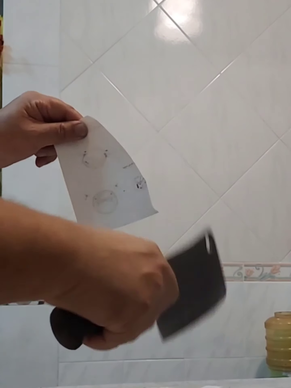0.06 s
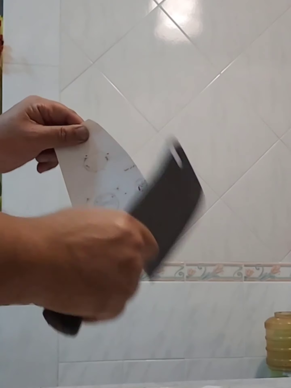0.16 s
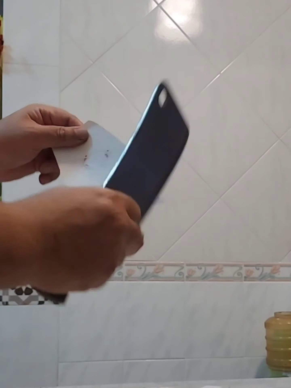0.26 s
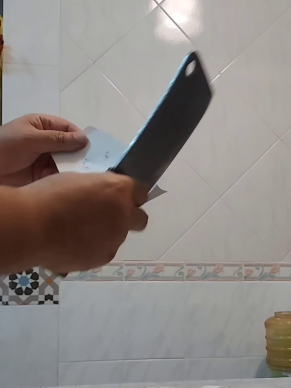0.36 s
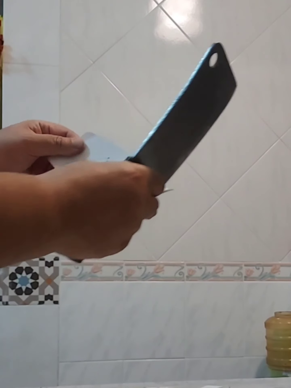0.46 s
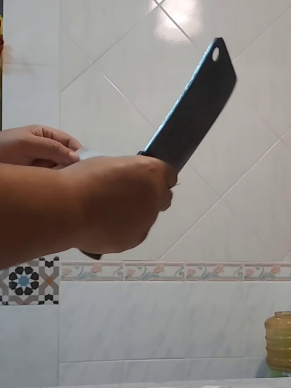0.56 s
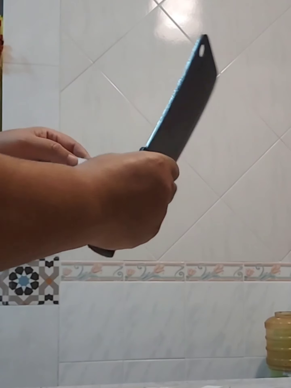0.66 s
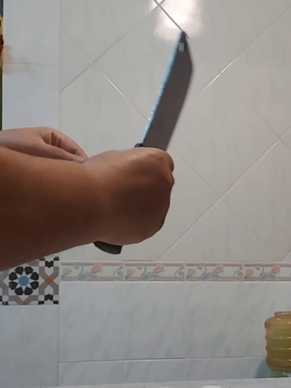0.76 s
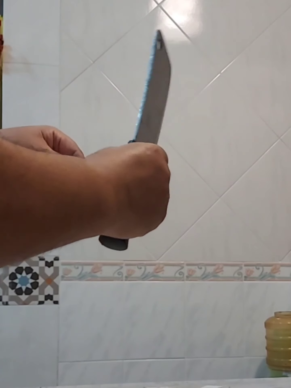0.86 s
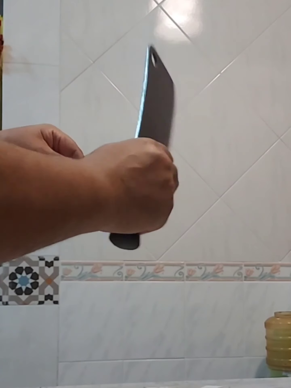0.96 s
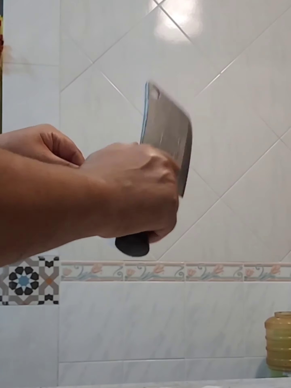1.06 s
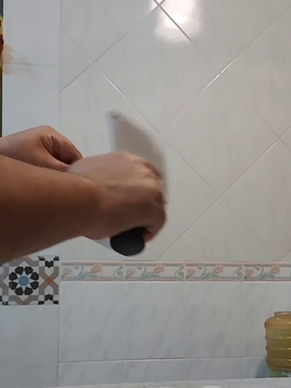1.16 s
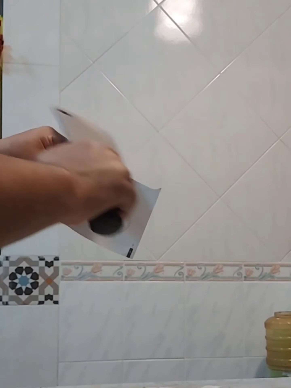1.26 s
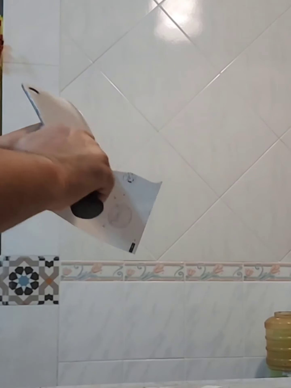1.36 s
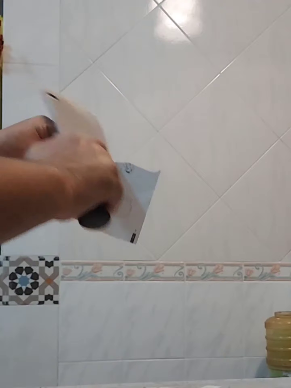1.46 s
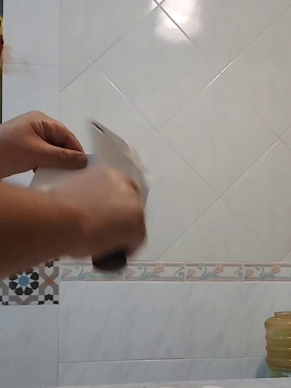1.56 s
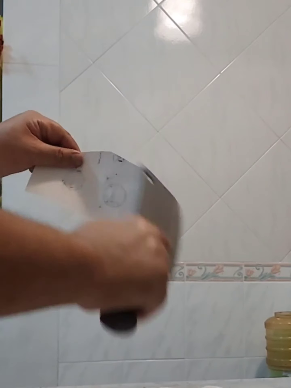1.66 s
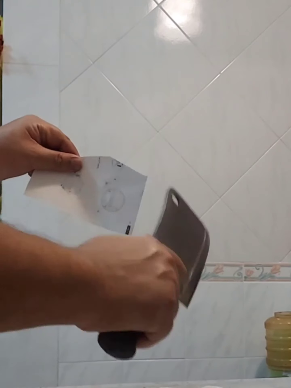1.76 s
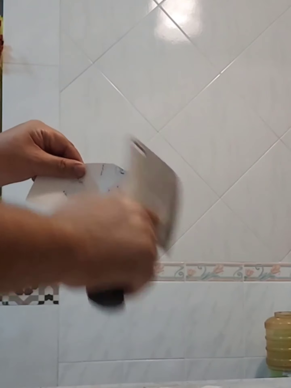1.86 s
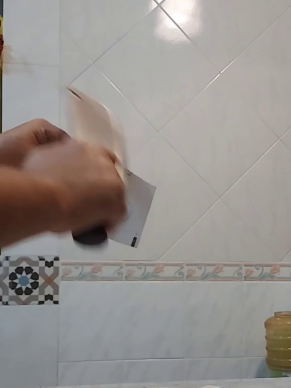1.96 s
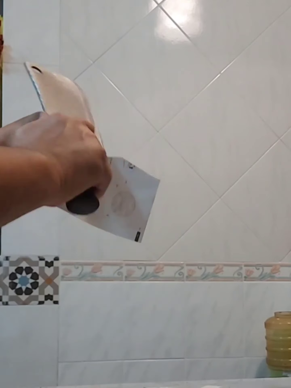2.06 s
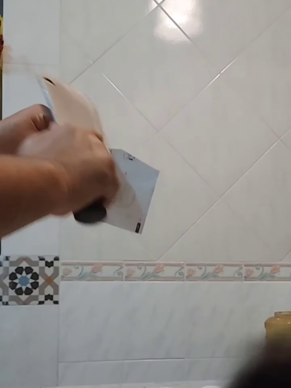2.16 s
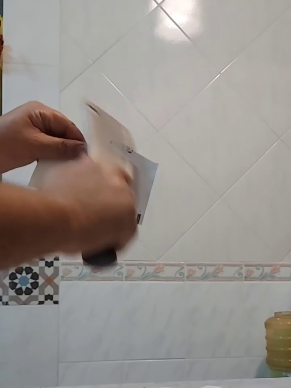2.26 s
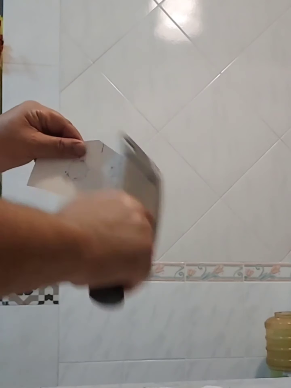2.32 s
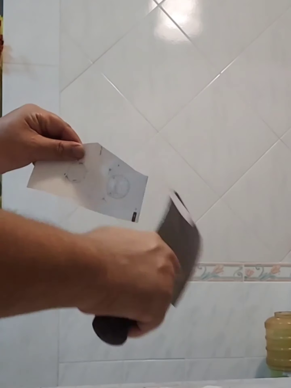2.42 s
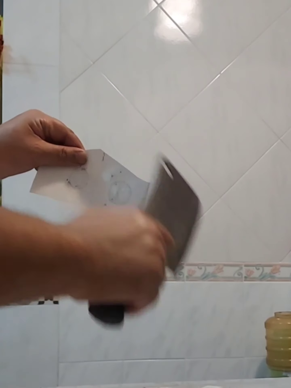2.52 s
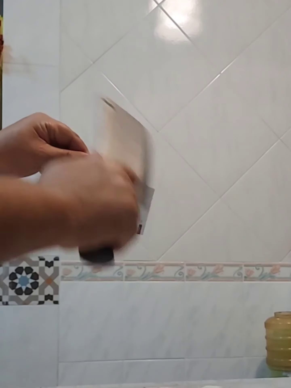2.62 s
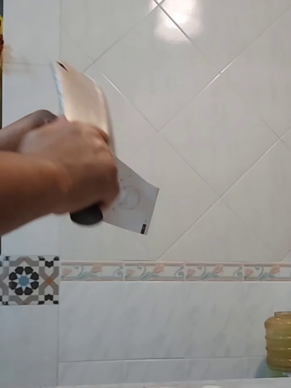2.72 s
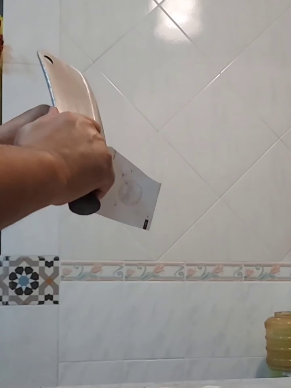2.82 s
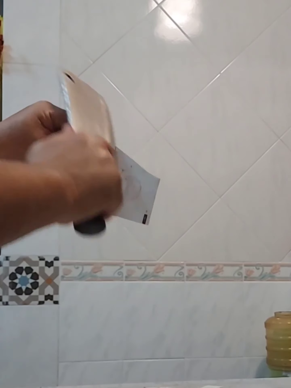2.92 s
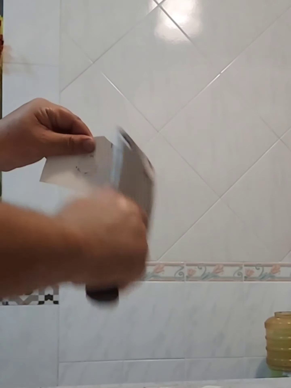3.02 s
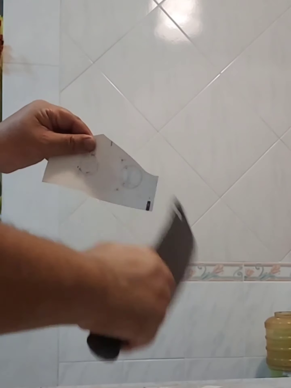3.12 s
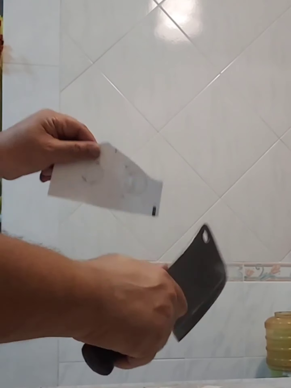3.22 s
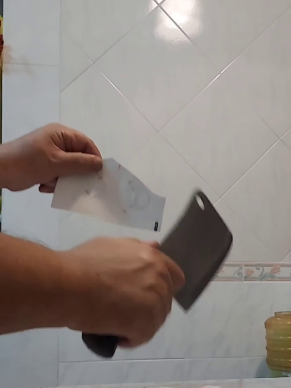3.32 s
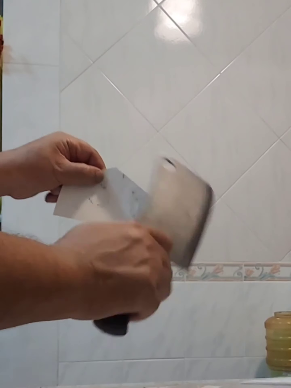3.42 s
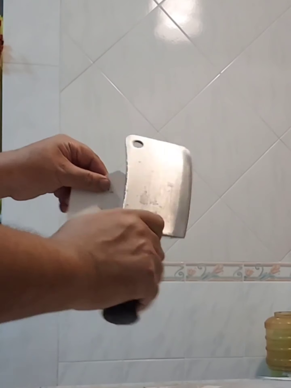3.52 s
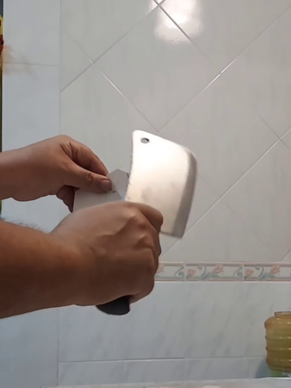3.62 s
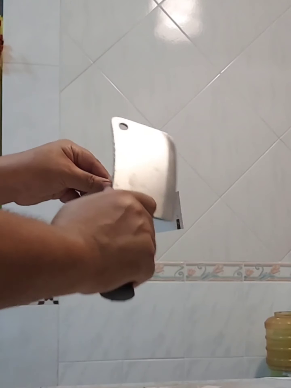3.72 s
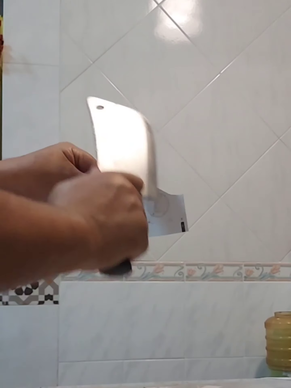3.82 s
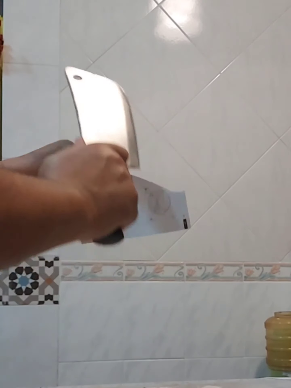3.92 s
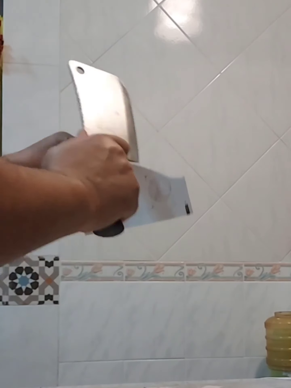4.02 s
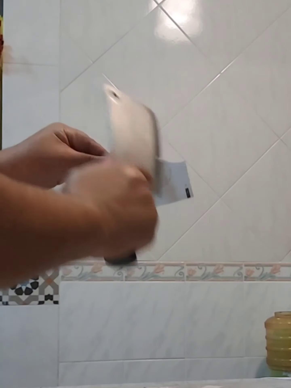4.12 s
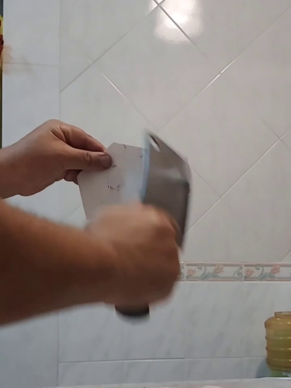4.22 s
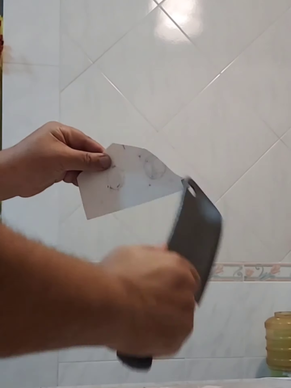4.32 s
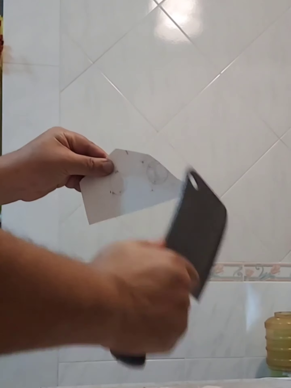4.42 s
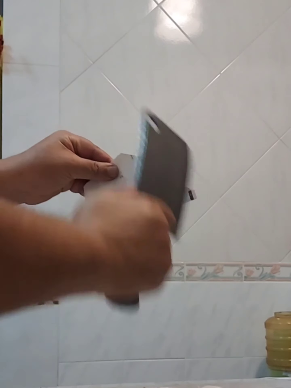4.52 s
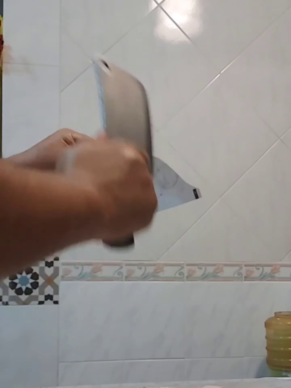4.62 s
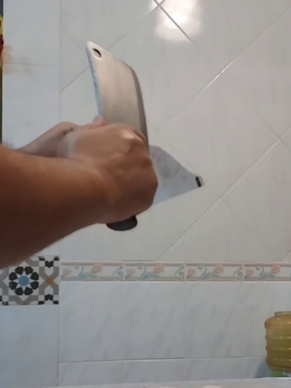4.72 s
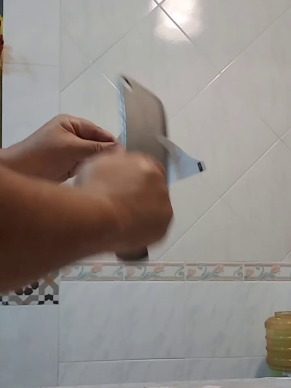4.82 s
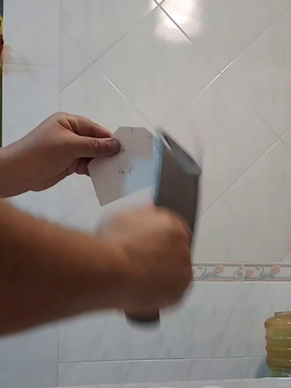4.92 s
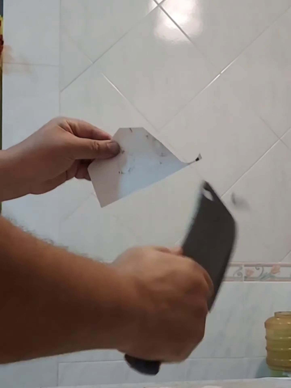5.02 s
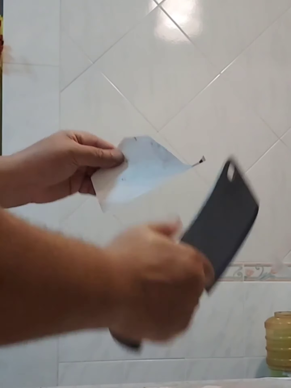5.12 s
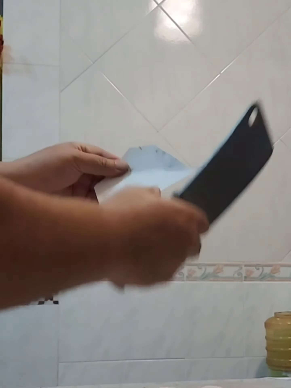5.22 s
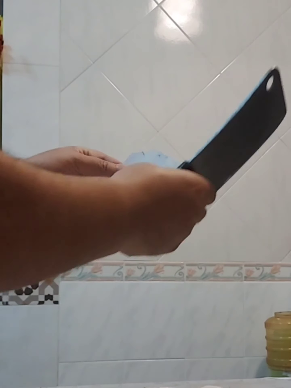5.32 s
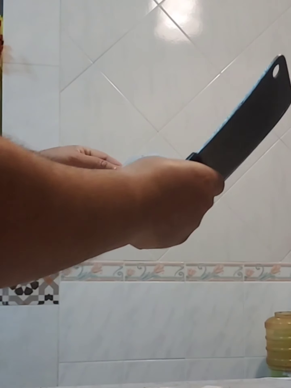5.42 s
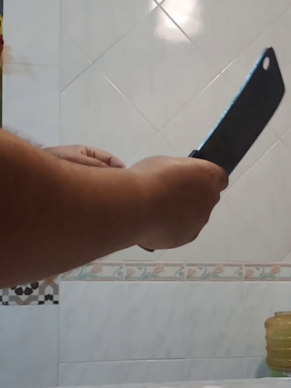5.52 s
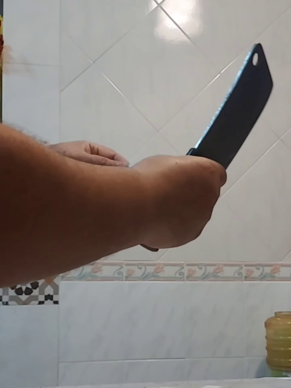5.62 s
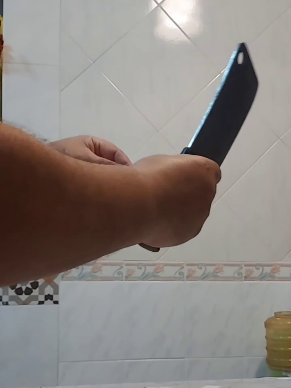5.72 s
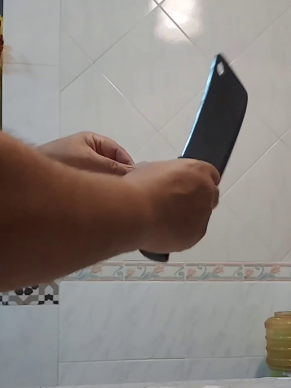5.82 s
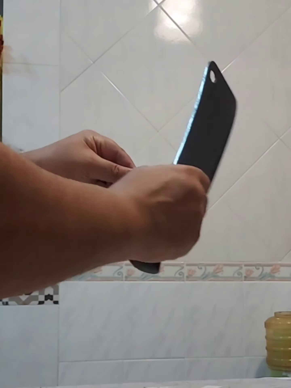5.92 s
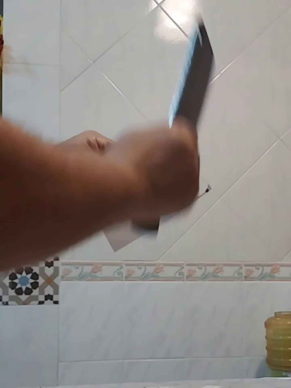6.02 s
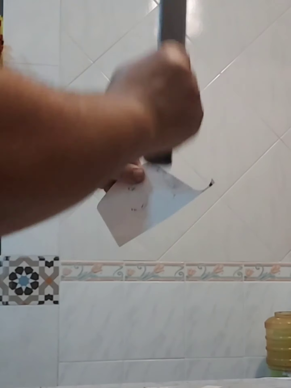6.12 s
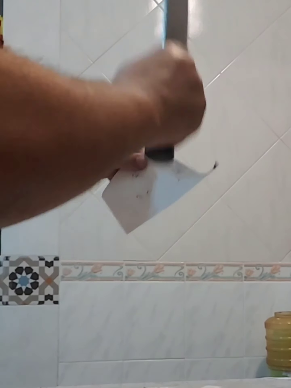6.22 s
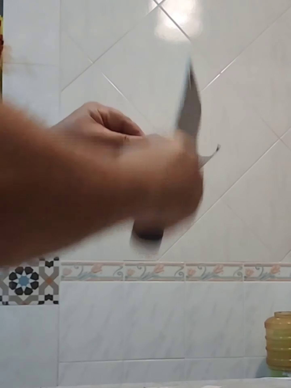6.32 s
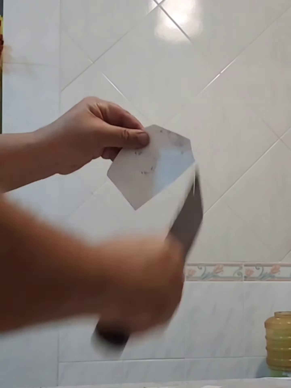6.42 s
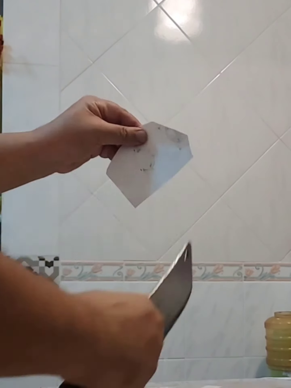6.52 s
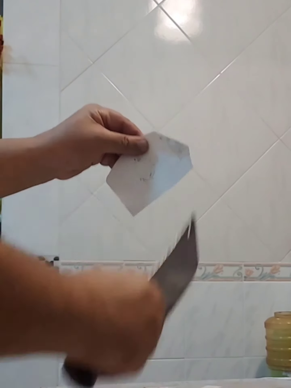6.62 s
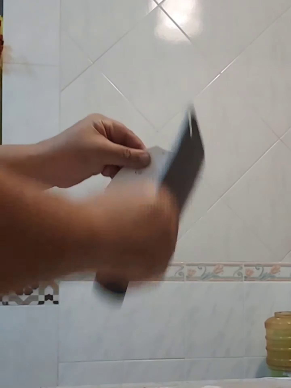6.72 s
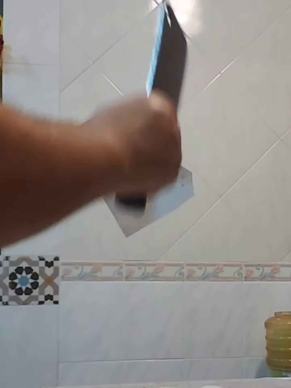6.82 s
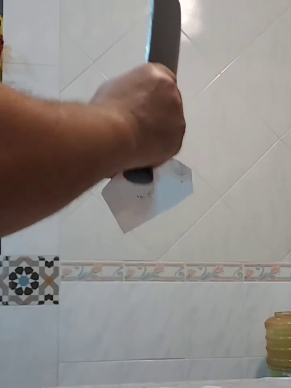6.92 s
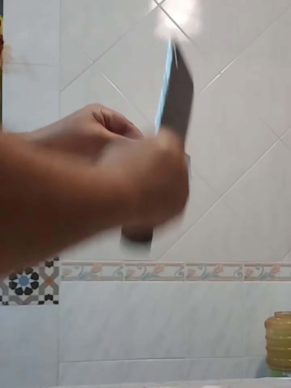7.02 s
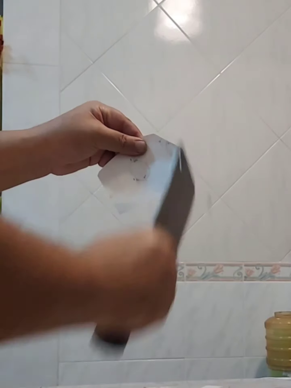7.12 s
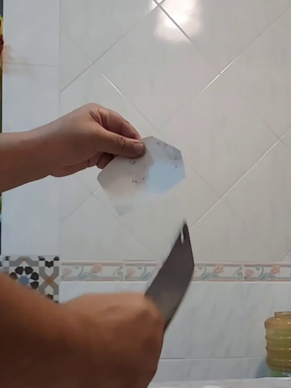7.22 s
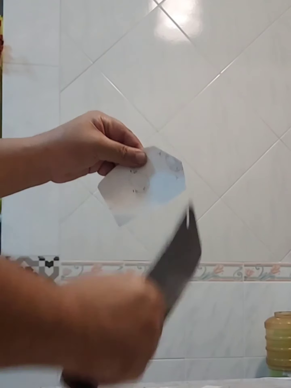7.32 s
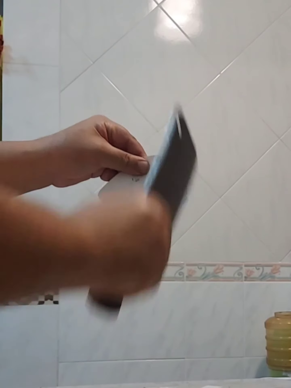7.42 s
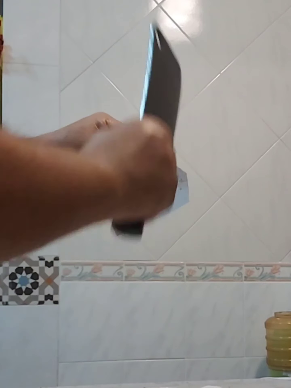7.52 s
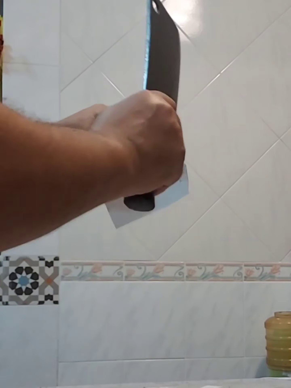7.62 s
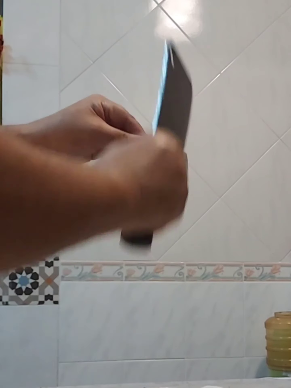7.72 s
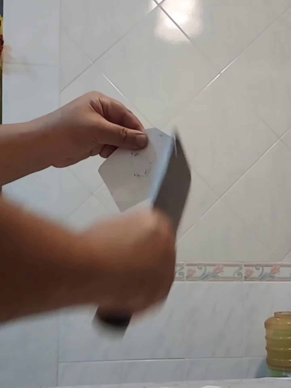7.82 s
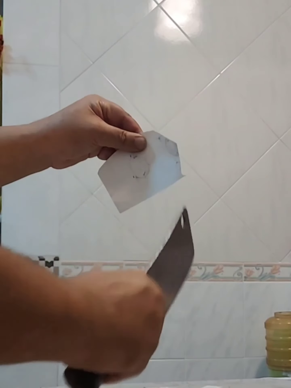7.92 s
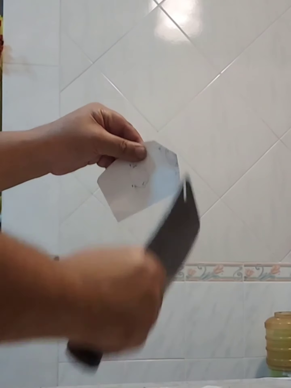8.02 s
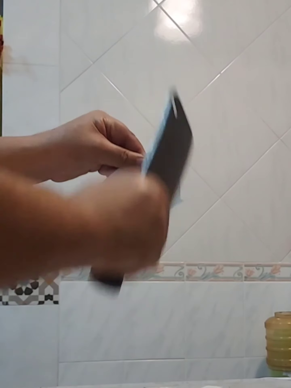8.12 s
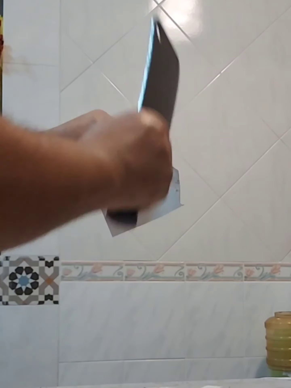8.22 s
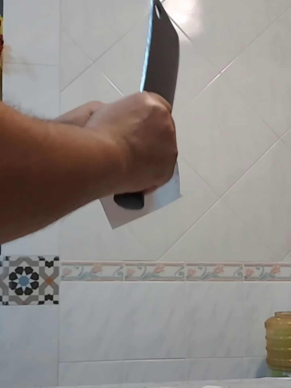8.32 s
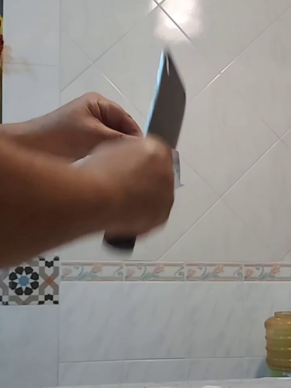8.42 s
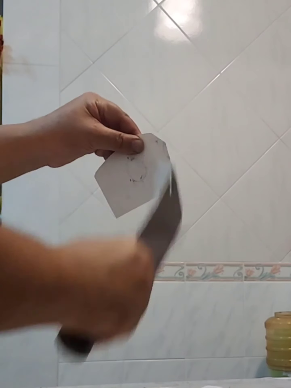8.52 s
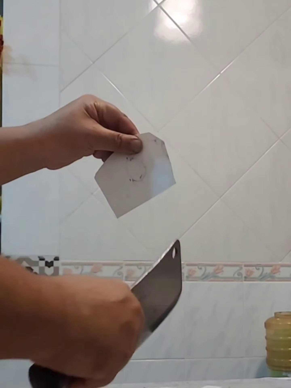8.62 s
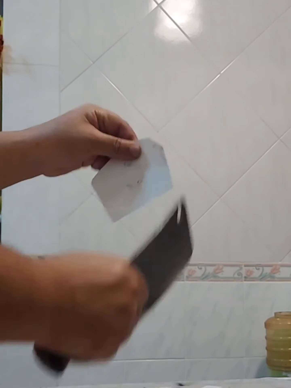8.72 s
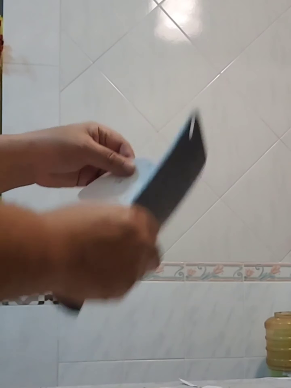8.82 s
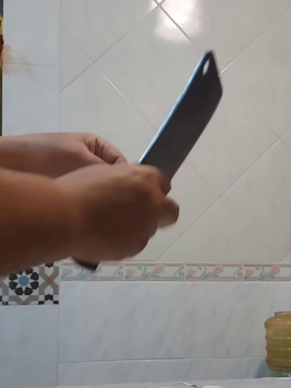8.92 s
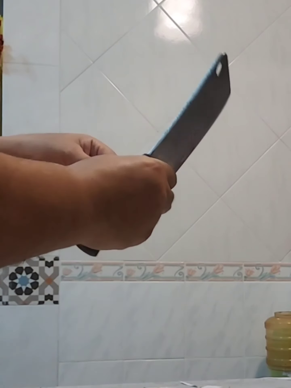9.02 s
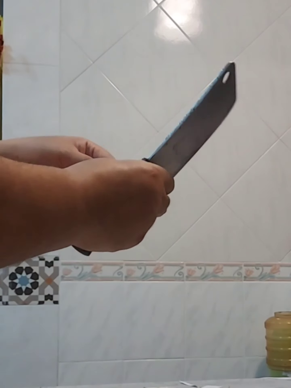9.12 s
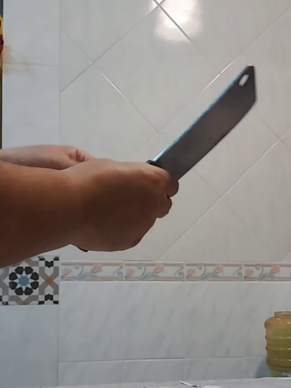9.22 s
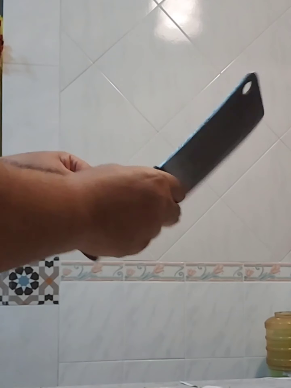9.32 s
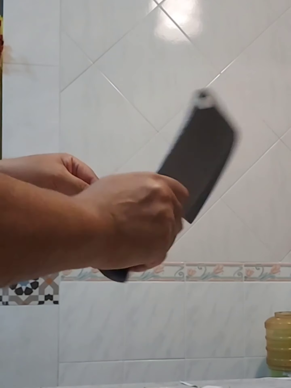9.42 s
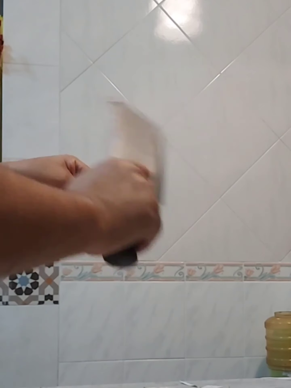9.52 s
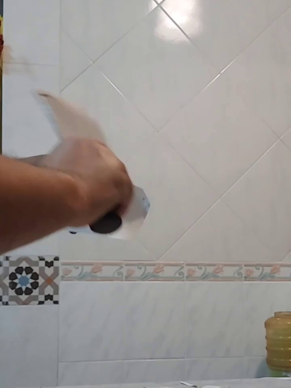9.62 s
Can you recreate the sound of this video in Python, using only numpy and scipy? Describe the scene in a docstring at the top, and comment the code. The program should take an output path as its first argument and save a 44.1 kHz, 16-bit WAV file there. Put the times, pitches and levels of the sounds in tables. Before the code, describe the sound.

A cleaver slices a hand-held sheet of paper in short crisp strokes, in a tiled room with a faint low hum.

```python
"""A cleaver slices strips off a hand-held sheet of paper in a small tiled room.
Each stroke is a dense run of snapping fibres, with sharper cracks where the sheet buckles.
The blade rings faintly, the sheet ticks and rustles between strokes, and the tiles reflect it all.
Underneath: a low beating hum, an engine droning outside and steady dull noise."""
import sys
import numpy as np
from scipy import signal
from scipy.fft import rfft, irfft, next_fast_len
from scipy.io import wavfile
from scipy.ndimage import map_coordinates

SR = 44100
rng = np.random.default_rng(int(sys.argv[2]) if len(sys.argv) > 2 else 0)


def transcribe(signal):
    """Save signal, clipped to [-1, 1], as a 16-bit WAV file at the path in sys.argv[1]."""
    frames = np.atleast_2d(signal).T
    limited = np.clip(frames, -1, 1)
    pcm = np.round(limited * 32767).astype(np.int16)
    wavfile.write(sys.argv[1], SR, pcm)


N = 426002
TIME_S = np.arange(N) / SR
FFT_SIZE = next_fast_len(N + SR, real=True)
CRACK_SPREAD = 1.53  # band edges: pitch divided and multiplied by this

# Cleaver strokes, before band trims: (contact [s], swell [s], hold [s], release [s], rasp [dB],
# entry [dB below rasp], fizz [dB re rasp], buzz [dB re rasp], flutter [dB re rasp])
STROKES = [ (0, 0.0018, 0.0027, 0.0054, -37, 13, 6, -1, 0.5),
           (1.638, 0.024, 0.067, 0.014, -35.5, 7.5, -0.5, -6, -12),
           (2.279, 0.1, 0.057, 0.019, -35, 12.5, 2, -2, -13),
           (2.999, .11, 0.091, .014, -36, 14.5, 1.5, -1.5, -9.5),
           (4.265, 0.053, 0.064, 0.021, -37.5, 8.5, 1, -3, -8),
           (4.897, 0.062, 0.13, .008, -39, 19, 7, 2, -8),
           (6.466, 0.0082, 0.0043, 0.025, -23.5, 14, -2, -5.5, -15.5),
           (7.184, 0.013, 0.06, .007, -38.5, -1.5, .5, 2, -7.5),
           (7.850, 0.08, .012, 0.039, -36, 6.5, 0.5, -1.5, -9.5),
           (8.513, .06, 0.076, 0.0067, -39, 5, 2, 6, -6), ]


def slicing(flutter_db=0.5, buzz_db=-6.0, rasp_db=-2.5, fizz_db=-0.5, catch_db=1.5):
    """The edge runs through the sheet, catching unevenly: low flutter, buzz, rasp, fine fizz."""
    attacks_s = [0.003, 0.003, 0.003, 0.01]  # fizz needs the blade to gather speed
    gains = np.zeros((4, N))
    for start_s, swell_s, hold_s, release_s, rasp, entry, fizz, buzz, flutter in STROKES:
        offsets_db = [flutter + flutter_db, buzz + buzz_db, rasp_db, fizz + fizz_db]
        for gain, db, attack_s in zip(gains, offsets_db, attacks_s):
            envelope = stroke_envelope(attack_s, swell_s, hold_s, release_s, entry)
            add(gain, start_s, from_db(rasp + db) * envelope)
    snaps = fibres(rate_per_s=6000, spread_db=3.5)
    # neighbouring ranges of the sheet move in opposite directions
    bands = [band(snaps, 159, 1250, order=3), -band(snaps, 1445, 2840),
             band(snaps, 2860, 7700, order=3), -band(snaps, 7510, 15700, order=3)]
    catching = from_db(catch_db * drift(rate_hz=61))
    return catching * sum(gain * part / rms(part) for gain, part in zip(gains, bands))


def stroke_envelope(attack_s, swell_s, hold_s, release_s, entry_db):
    """The edge bites; the cut swells, holds, and dies as the blade leaves."""
    age_s = TIME_S[:SR // 2]
    bite = np.clip(age_s / attack_s, 0, 1)
    swell = from_db(-entry_db * np.maximum(1 - age_s / swell_s, 0))
    leave = np.exp(-np.maximum(age_s - swell_s - hold_s, 0) / release_s)
    return bite * swell * leave


def fibres(rate_per_s, spread_db):
    """Fibres snap at random times with uneven sizes; the sheet radiates them."""
    # Paper colour: (frequency [Hz], gain [dB])
    paper_spectrum = [(150, 0.5), (270, 5.5), (450, -4.5), (640, -0.5), (1100, -2), (1350, -4.5), (1750, 0),
                      (2300, -1.5), (3000, -6), (5000, -4.5), (6600, -3), (8300, -10), (11400, -3.5),
                      (16000, -5.5)]
    sizes = from_db(spread_db * np.minimum(rng.exponential(1, N), 4)) * rng.choice([-1, 1], N)
    snapping = rng.random(N) < rate_per_s / SR
    return coloured(sizes * snapping, paper_spectrum)


def buckling(bite_crack_db=16, bite_thump_db=1, bite_hz=2800):
    """The sheet gives way at first contact, mid-stroke and as the strip parts: a bright crack, a dull flap of
    its face."""
    # Buckles within strokes, and flicks as the strip parts: (time [s], crack [dB], pitch [Hz], thump [dB])
    buckles = [(1.657, -21, 2600, -27), (2.378, -18.5, 2620, -28), (2.4413, -28, 2000, -24.5),
               (3.108, -20.5, 2100, -23), (3.2038, -26, 2590, -24.5), (4.2991, -18.5, 1870, -22.5),
               (4.3413, -19.5, 2480, -23.5), (4.9799, -20, 1900, -19), (5.053, -26, 1890, -27),
               (5.084, -7, 9500, -32), (5.0967, -29, 2600, -24.5), (6.4685, -23, 2580, -16.5),
               (6.4759, -15, 3600, -31), (6.506, -32, 2600, -21), (7.2441, -28, 2190, -33),
               (7.8839, -12, 2380, -25), (7.935, -19, 2900, -26), (7.9815, -22, 1750, -30.5),
               (8.5876, -12, 2100, -28), (8.6422, -17, 2640, -25.5)]
    bites = [(start_s, rasp - entry + bite_crack_db, bite_hz, rasp - entry + bite_thump_db)
             for start_s, _, _, _, rasp, entry, *_ in STROKES]
    out = np.zeros(N)
    for start_s, crack_db, hz, thump_db in bites + buckles:
        crack = snap(hz / CRACK_SPREAD, hz * CRACK_SPREAD, crumble=0.16, decay_s=0.002)
        thump = snap(230, 1200, crumble=0.1, decay_s=0.004)
        add(out, start_s, from_db(crack_db) * crack + from_db(thump_db) * thump)
    return out


def snap(low_hz, high_hz, crumble, decay_s, rise_s=0.0012):
    """One sharp release, then a short crumble of fibres."""
    t = TIME_S[:2048]
    release = band(signal.unit_impulse(len(t)), low_hz, high_hz)
    envelope = np.exp(-t / decay_s) * (1 - np.exp(-t / rise_s))
    crumbling = band(rng.standard_normal(len(t)) * envelope, low_hz, high_hz)
    return (release + crumble * crumbling) / np.abs(release).max()


def blade(drive):
    """The steel rings faintly with the force of the cut."""
    # Blade modes: (frequency [Hz], level [dB], t60 [s])
    modes = [(1773, -20.5, 0.51), (1900, -52, 0.37), (2273, -28.5, 0.1), (3270, -21, 0.09),
             (3520, -29, 0.55), (3720, -34, 0.55), (4910, -27, 0.11)]
    # A smaller, stiffer sheet shakes the blade harder: (time [s], gain [dB])
    coupling = [(1.6, -13), (6.5, 2.5), (7.2, -2.5), (8.6, 1)]
    out = np.zeros(N)
    for hz, db, t60_s in modes:
        radius, angle = from_db(-60 / (t60_s * SR)), 2 * np.pi * hz / SR
        ring = signal.lfilter([1, 0, -1], [1, -2 * radius * np.cos(angle), radius ** 2], drive)
        out += from_db(db) * rms(drive) * ring / rms(ring)
    return out * from_db(at_time(coupling))


def ticking(crack_trim_db=3.0, fizz_trim_db=8.0):
    """The sheet gives single dry ticks between strokes."""
    # Ticks, before trims: (time [s], crack [dB], pitch [Hz], fizz [dB])
    ticks = [(.278, -21, 5300, -19.5), (2.7828, -50, 4200, -41), (6.737, -28, 5500, -25),
             (7.1298, -36, 2600, -44), (8.168, -50, 4200, -35), (8.8276, -35, 5000, -39),
             (9.231, -42.5, 2600, -62), (9.433, -36, 2000, -62), (9.4926, -33.5, 4400, -45)]
    out = np.zeros(N)
    for start_s, crack_db, hz, fizz_db in ticks:
        crack = snap(hz / CRACK_SPREAD, hz * CRACK_SPREAD, crumble=0.15, decay_s=0.0008)
        fizz = snap(6000, 15000, crumble=0.15, decay_s=0.0008)
        add(out, start_s, from_db(crack_db + crack_trim_db) * crack)
        add(out, start_s, from_db(fizz_db + fizz_trim_db) * fizz)
    return out


def handling(trim_db=0.5):
    """The sheet rustles softly as the hands move."""
    # Rustles, before trim: (centre [s], half length [s], level [dB])
    rustles = [(0.345, 0.067, -56.5), (0.587, 0.13, -62.5), (1.064, 0.05, -60), (3.567, 0.19, -62),
               (5.984, 0.24, -69), (6.298, 0.044, -63.5), (8.195, 0.025, -55.5), (8.884, 0.03, -59),
               (9.477, 0.042, -61)]
    grains = band(fibres(rate_per_s=3200, spread_db=5.0), 960, 21000)
    swell = sum(from_db(db + trim_db) * np.exp(-np.minimum(((TIME_S - centre_s) / half_s) ** 2, 20))
                for centre_s, half_s, db in rustles)
    return grains / rms(grains) * swell


def direct_path(x, lead_s=0.0001, swing_s=0.00003):
    """Sound reaches the left microphone first; the lead moves with the hand."""
    delay_s = lead_s + swing_s * drift(rate_hz=3.3)
    right = map_coordinates(x, [(TIME_S - delay_s) * SR], order=5)
    return np.array([x, right])


def tiled_room(x, patterns=7, fades_per_s=13):
    """The cut travels with the hand, so one reflection pattern fades into the next."""
    position = TIME_S * fades_per_s
    wet = 0
    for k in range(patterns):
        distance = np.abs((position - k) % patterns - 1)
        share = np.cos(np.pi / 2 * np.minimum(distance, 1))
        wet = wet + rfft(x * share, FFT_SIZE) * rfft(room_response(), FFT_SIZE)
    return irfft(wet, FFT_SIZE)[:, :N]


def room_response(early_db=-3.5, tail_db=-3.5, early_decay_s=0.017, first_echo_s=0.0026):
    """A quick spray off the near wall, and a bright tail that dies octave by octave."""
    # Room decay: (frequency [Hz], t60 [s])
    decay_times = [(200, 1), (700, 0.84), (2000, .68), (5000, 0.57), (11000, 0.58), (16000, 0.41)]
    t = TIME_S[:SR]
    noise, spray = diffuse(SR) * (t > first_echo_s), diffuse(SR) * (t > first_echo_s)
    centres_hz = np.geomspace(125, 16000, 8)
    tail = 0
    for centre_hz, weights in zip(centres_hz, np.eye(len(centres_hz))):
        octave = shaped(noise, lambda hz: at_hz(np.c_[centres_hz, weights], hz))
        tail = tail + octave * np.exp(-np.log(1000) * t / at_hz(decay_times, centre_hz))
    early = spray * np.exp(-t / early_decay_s)
    return (from_db(tail_db) * tail / rms(tail) + from_db(early_db) * early / rms(early)) / np.sqrt(SR)


def hum(trim_db=3.0):
    """Close low tones beat against each other."""
    # Hum tones: (frequency [Hz], relative level [dB], unsteadiness [ratio])
    tones = [(89.87, -6, 0.63), (92.3, -4.5, 0.38), (98.7, -4.5, 0.32), (188.5, -13, 0.4)]
    # Hum strength, before trim: (time [s], level [dB])
    levels = [(0, -51), (.8, -55), (2.2, -52), (2.8, -57.5), (3.3, -48.5), (4.3, -50), (5.1, -45.5),
              (5.7, -51.5), (9.66, -53)]
    beating = sum(from_db(db) * wavering(2 * np.pi * hz * TIME_S, unsteady, rate_hz=6.4)
                  for hz, db, unsteady in tones)
    return from_db(at_time(levels) + trim_db) * beating


def engine(trim_db=-5.0, surge_db=2.5):
    """A few low orders pass the walls; each surges, and swells as it nears a room resonance."""
    # Engine speed: (time [s], firing rate [Hz])
    speeds = [(0, 45.2), (3, 46), (4.8, 47.13), (6, 47.04), (7.5, 47.31), (8.9, 48.07), (9.66, 48.8)]
    # Engine orders: (multiple of firing rate, relative level [dB])
    orders = [(3, -3), (5, -0.5), (6, 0), (7, -8.5)]
    # Strength indoors, before trim: (time [s], level [dB])
    levels = [(0, -63.5), (2.5, -65.5), (3.3, -58.5), (4.8, -56.5), (6, -53), (8.3, -51), (9.66, -53)]
    # Low room resonances: (frequency [Hz], width [Hz], lift [dB])
    room_modes = [(140.6, 3, 6.5), (234.3, 2.7, 4.5), (288.8, 1.3, 13.5), (330.6, 12.8, 11.5)]
    firing_hz = at_time(speeds)
    phase = 2 * np.pi * np.cumsum(firing_hz) / SR
    out = np.zeros(N)
    for order, db in orders:
        lift_db = sum(peak_db / (1 + (2 * (order * firing_hz - hz) / width_hz) ** 2)
                      for hz, width_hz, peak_db in room_modes)
        gain = from_db(db + lift_db + surge_db * drift(rate_hz=3.5))
        out += gain * wavering(order * phase, unsteady=0.77, rate_hz=16.0)
    return from_db(at_time(levels) + trim_db) * out


def air(midband_db=-58):
    """Steady dull background noise."""
    # Noise colour: (frequency [Hz], gain [dB])
    spectrum = [(12, -52), (25, -24), (48, -14), (64, -7), (78, -19), (115, -6), (160, -12.5), (300, -17.5),
                (450, -16.5), (750, -18.5), (1350, -24.5), (1750, -23), (3000, -33.5), (6700, -39.5),
                (8500, -45), (11500, -45), (16000, -45.5)]
    noise = coloured(diffuse(FFT_SIZE)[:, :N], spectrum)
    return from_db(midband_db) * noise / rms(band(noise.mean(axis=0), 400, 4000))


def diffuse(size):
    """Stereo noise from all sides: alike in the bass, unrelated in the treble."""
    # Microphone pair: (frequency [Hz], left-right likeness [ratio])
    likeness = [(40, 1.1), (100, 0.55), (300, 0.95), (640, 0.55), (1400, -0.56), (3000, 0), (7000, 0),
                (15000, 0)]
    mid, side = rfft(rng.standard_normal((2, size)))
    alike = np.clip(at_hz(likeness, np.fft.rfftfreq(size, 1 / SR)), -1, 1)
    return irfft(np.sqrt((1 + alike) / 2) * mid + np.sqrt((1 - alike) / 2) * side * [[1], [-1]], size)


def wavering(phase, unsteady, rate_hz):
    """Tone of rms about 1 with wandering strength and phase."""
    in_phase = (1 + unsteady * drift(rate_hz)) * np.sin(phase)
    quadrature = unsteady * drift(rate_hz) * np.cos(phase)
    return np.sqrt(2 / (1 + 2 * unsteady ** 2)) * (in_phase + quadrature)


def drift(rate_hz, size=16384):
    """Low-passed random wander, rms 1."""
    hz = np.fft.rfftfreq(size, TIME_S[-1] / size)
    slow = irfft(rfft(rng.standard_normal(size)) / (1 + (hz / rate_hz) ** 2))
    return np.interp(TIME_S, np.linspace(0, TIME_S[-1], size), slow / rms(slow))


def shaped(x, gain_at):
    """Filter by a gain function of frequency."""
    size = FFT_SIZE if x.shape[-1] == N else x.shape[-1]
    return irfft(rfft(x, size) * gain_at(np.fft.rfftfreq(size, 1 / SR)), size)[..., :x.shape[-1]]


def coloured(x, spectrum):
    """Filter by a dB table."""
    return shaped(x, lambda hz: from_db(at_hz(spectrum, hz)))


def panned(x, balance):
    """Share each frequency between left and right."""
    return shaped(x, lambda hz: from_db(at_hz(balance, hz) * [[0.5], [-0.5]]))


def band(x, low_hz, high_hz, order=2):
    """Causal band-pass."""
    sos = signal.butter(order, [low_hz, min(high_hz, 0.48 * SR)], "band", fs=SR, output="sos")
    return signal.sosfilt(sos, x + 1e-18)


def at_hz(points, hz):
    """Read a table on a log-frequency axis."""
    known_hz, values = np.transpose(points)
    return np.interp(np.log(np.maximum(hz, 1)), np.log(known_hz), values)


def at_time(points):
    """Read a time table at every sample."""
    return np.interp(TIME_S, *np.transpose(points))


def add(track, start_s, sound):
    """Mix in place."""
    start = max(round(start_s * SR), 0)
    track[start:start + len(sound)] += sound[:N - start]


def from_db(db):
    """Decibels to gain."""
    return 10 ** (np.asarray(db) / 20)


def rms(x):
    """Root mean square."""
    return np.sqrt(np.mean(x ** 2) + 1e-20)


def scene(direct_db=-1.0, sharp_send_db=-3):
    """Paper and blade in the room, over the background."""
    # Stereo balance of the cut and of the background: (frequency [Hz], left minus right [dB])
    cut_balance = [(100, -6), (400, -1.5), (1300, -1.5), (2400, 0.5), (4400, -7), (8000, -4), (15000, -5.5)]
    background_balance = [(100, 1.5), (400, -3.5), (1300, 1.6), (4400, -3.5), (15000, -2.5)]
    slices, cracks = slicing(), buckling()
    sheet = slices + blade(slices + cracks) + handling()
    sharp = cracks + ticking()
    near = from_db(direct_db) * direct_path(sheet + sharp)
    # sharp cracks beam at the microphones, so less reaches the tiles
    reflected = tiled_room(sheet + from_db(sharp_send_db) * sharp)
    background = air() + hum() + engine()
    return panned(near + reflected, cut_balance) + panned(background, background_balance)


def record(dry, cutoff_hz=16000):
    """Microphone treble dip, then a steep low-pass."""
    # Microphone response: (frequency [Hz], gain [dB])
    treble_dip = [(6700, -0.5), (7700, -5.5), (8900, -5.5), (10400, -2.5)]
    low_pass = signal.ellip(10, 0.05, 60, cutoff_hz, fs=SR, output="sos")
    return signal.sosfiltfilt(low_pass, coloured(dry, treble_dip))


dry = scene()
out = record(dry)
transcribe(out)
```